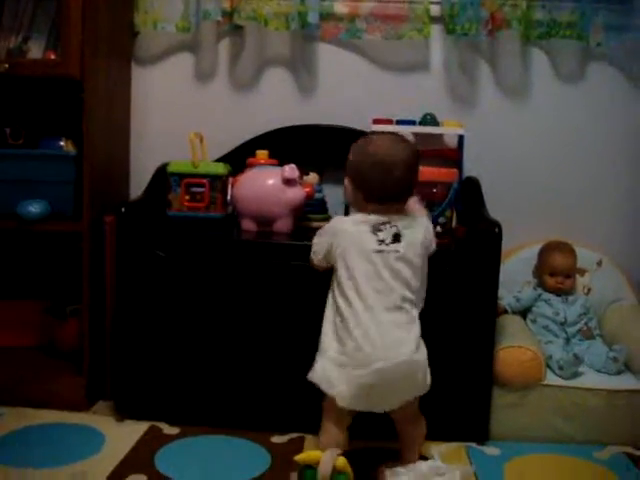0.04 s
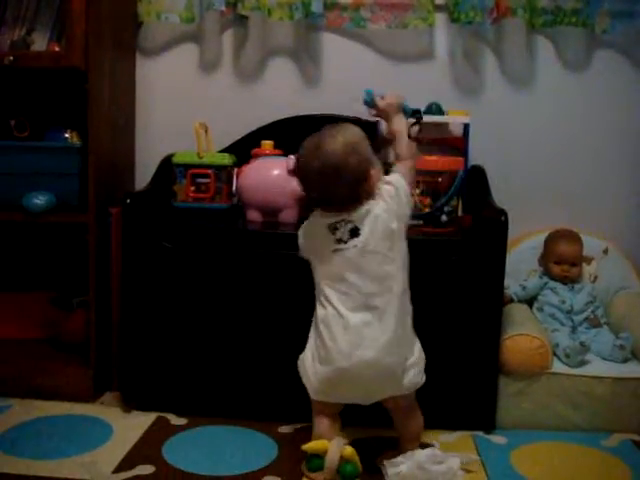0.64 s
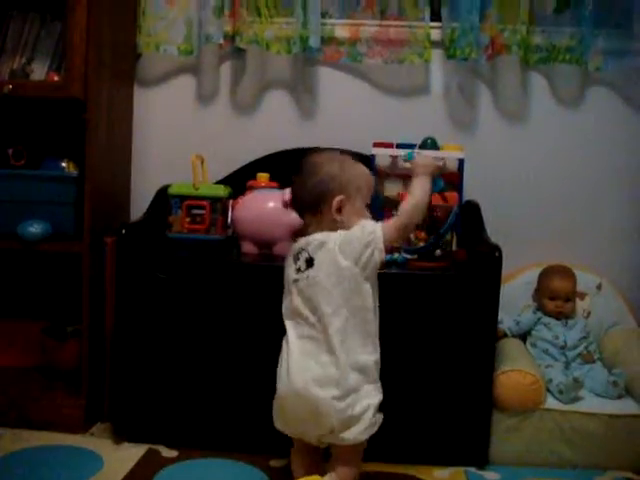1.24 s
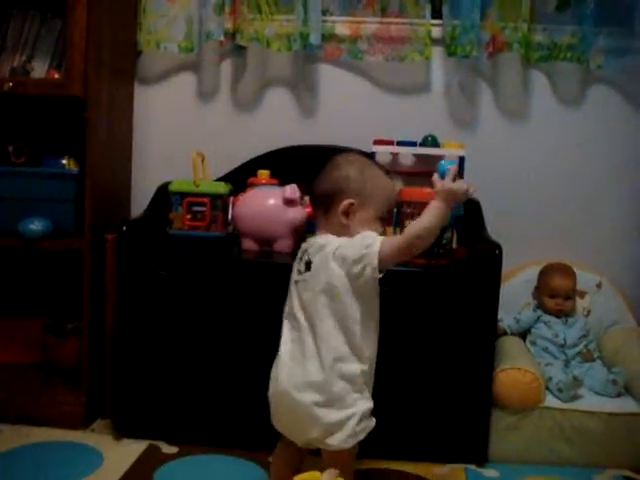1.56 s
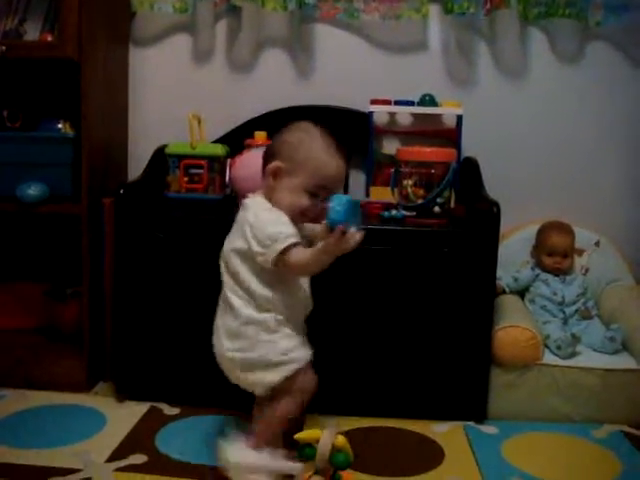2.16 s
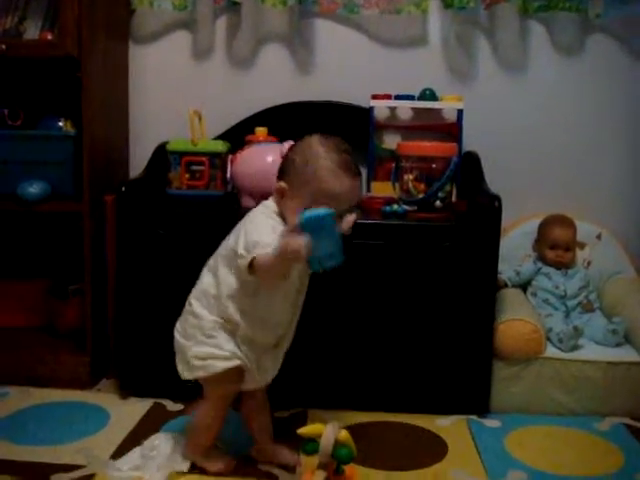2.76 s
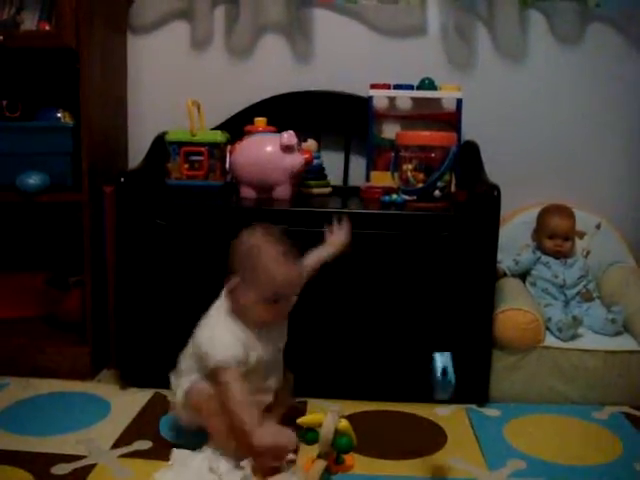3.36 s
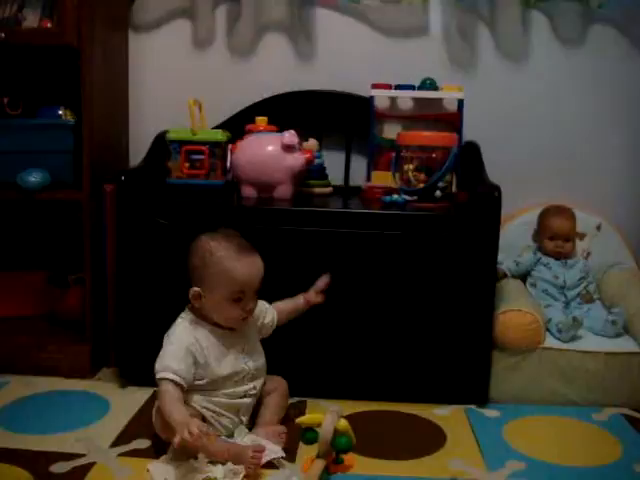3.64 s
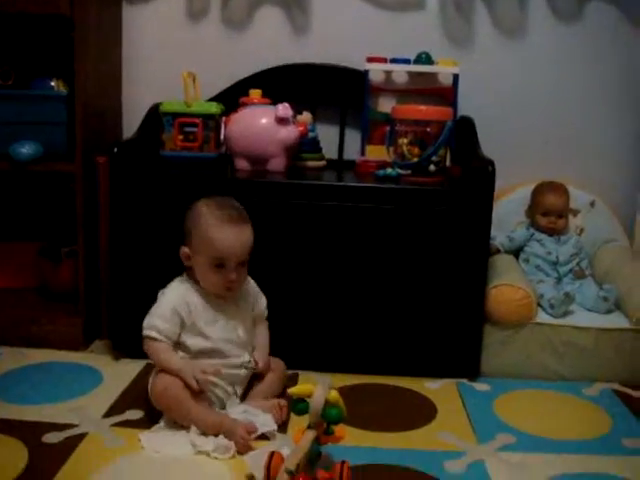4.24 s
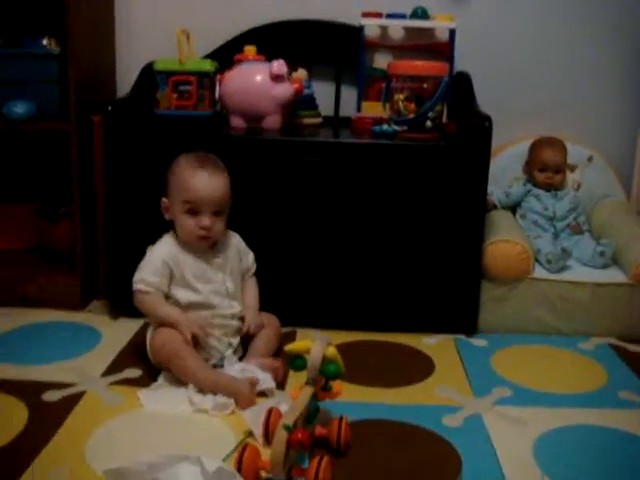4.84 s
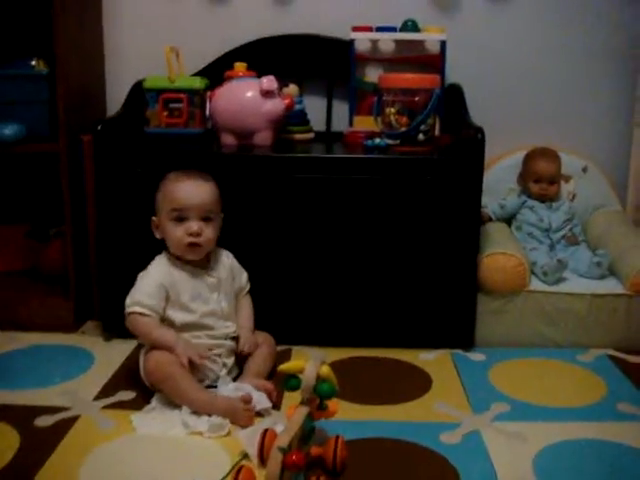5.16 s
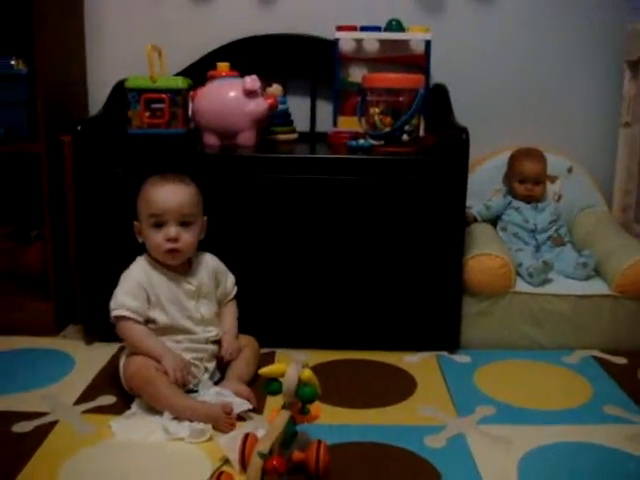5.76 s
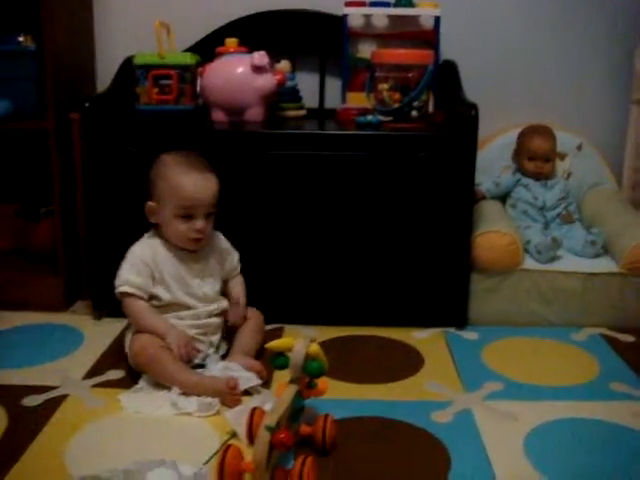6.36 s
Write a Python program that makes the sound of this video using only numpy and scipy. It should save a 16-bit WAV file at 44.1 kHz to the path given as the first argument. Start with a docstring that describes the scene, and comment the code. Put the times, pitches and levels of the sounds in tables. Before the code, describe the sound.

Soft room tone and microphone hiss run throughout in a small bedroom. For the first three seconds a toddler drags a hollow plastic toy over other toys, making quiet taps and rubs, with a soft sliding scrape around 1.3 seconds. At 2.7 seconds a camera lens motor whirrs faintly and briefly, lightly thumping the microphone. A few more taps and a rustle of clothes follow. At 3.3 seconds the toy falls with a sharp clack and quick bounces, the loudest moment. At 3.5 seconds the child sits on a play mat with a soft, low bump and rustle. From about 3.7 to 4.4 seconds the plastic toy clatters against a wooden toy in three quick clusters, each knock ringing briefly in the room. Then it goes quiet. The motor whirrs again near 5.6 seconds, and a very faint rustle runs from 5.9 seconds to the end.

```python
"""Over room tone and microphone hiss, a toddler drags a plastic toy across others on a chest: light taps,
scrapes, a ringing hollow shell. A camera's lens motor whirrs briefly. At 3.3 s the toy falls and bounces,
the child sits down with a bump on a play mat, and the toy clatters against a wooden pull toy, the small
bedroom ringing after each knock. The motor whirrs once more, and a faint rustle closes the scene."""
import sys
import numpy as np
from scipy import signal
from scipy.fft import rfft, irfft, next_fast_len
from scipy.io import wavfile
from scipy.ndimage import uniform_filter1d

SR = 44100
rng = np.random.default_rng(int(sys.argv[2]) if len(sys.argv) > 2 else 0)


def generate_wav(signal):
    """Clip the signal to [-1, 1] and save it as 16-bit WAV at the path in sys.argv[1]."""
    frames = np.transpose(np.atleast_2d(signal))
    scaled = np.clip(frames, -1, 1) * 32767
    pcm = np.round(scaled).astype(np.int16)
    wavfile.write(sys.argv[1], SR, pcm)


N = 282681
TIME = np.arange(N) / SR

# room tone and hiss, a little louder at first: t/s, level/dB
ROOM_TONE_FADE = [(0, -49.5), (.55, -52.5), (6.4, -53.5)]
# EQ curves of the room tone, rubbing and sliding: f/Hz, relative level/dB
ROOM_TONE_EQ = [(15, -42), (25, -17), (49, -14), (145, -7), (494, -4), (532, -5), (1020, -5.5), (1640, -10),
                (2280, -8.5), (3000, -15), (7780, -17), (10000, -21.5), (13000, -53), (22000, -120)]
RUB_EQ = [(530, -47), (900, -8.5), (1220, -11), (1550, -7.5), (2900, -3.5), (4990, -5), (6820, -4.5),
          (10000, -9), (13000, -52), (22000, -120)]
SLIDE_EQ = [(410, -46), (700, 0), (954, 8), (1180, 4), (2040, 8), (3500, -49), (4550, -24), (7700, -120)]
# runs of the lens motor: start/s, stop/s, whirr f/Hz, whirr level/dB
MOTOR_RUNS = [(2.68, 2.813, 258, -56), (5.55, 5.683, 257.3, -55)]
# resonances of its gears: low/Hz, high/Hz, level at full speed/dB
GEAR_BANDS = [(713, 1020, -54), (1990, 2520, -54.5)]
# clothes and mat as the child crouches, sits and shifts: t/s, length/s, level/dB
RUSTLE_CUES = [(2.93, 0.087, -42), (3.05, 0.18, -49), (3.54, 0.092, -40.5), (5.87, .53, -61)]
# the toy sliding down another one: t/s, length/s, level/dB
SLIDE_CUES = [(1.29, 0.26, -48.5)]
# plastic rubbing on plastic and cloth: t/s, length/s, level/dB, shell ring relative to the rub/dB
RUB_CUES = [(0.0, 0.032, -48, -1), (0.236, 0.038, -49, -1.5), (0.722, 0.18, -49.5, -12),
            (0.867, 0.29, -45.5, -10.5), (1.118, 0.054, -46.5, -17), (1.227, .36, -53.5, -26),
            (1.326, 0.19, -45, -14), (2.026, 0.073, -44.5, -9), (2.125, 0.087, -47, -11),
            (2.277, 0.59, -50.5, -9), (2.538, 0.057, -48.5, -10), (2.727, 0.07, -59.5, 9.5)]
# broad, damped resonances of the rubbed plastic and of each struck toy: f/Hz, width/Hz, boost/dB
RUB_BODY = [(3150, 3600, 1)]
PLASTIC_BODY = [(152, 29, 11), (715, 460, 6), (1973, 250, 9), (2360, 300, 8.5), (6280, 400, 5)]
WOOD_BODY = [(140, 92, -10), (290, 150, 9), (526, 220, 0.5), (850, 203, 14), (2205, 1100, 9.5),
             (5980, 3600, 13)]
# ringing modes of each toy: f/Hz, relative level/dB, t60/s
PLASTIC_MODES = [(170, 6, 0.073), (585, 2.5, 0.12), (786, 1, 0.056), (943, 4, 0.15), (1070, -7, 0.21),
                 (1820, 7, 0.12), (1858, 3, 0.13), (1887, 4, 0.17), (1934, 3.5, 0.26), (2200, -7, 0.2),
                 (2180, 2, 0.26), (2300, 3, 0.22), (2300, 4, 0.2), (2420, -15, 0.09), (3293, 3.5, 0.097),
                 (4730, -8, 0.059), (4540, -1.5, 0.22), (6000, -3, 0.12), (6650, -14, 0.16),
                 (6440, -5, 0.096), (8500, -11, 0.11)]
WOOD_MODES = [(266, -0.5, 0.052), (376, -2.5, 0.065), (751, 0, 0.11), (801.6, 0, 0.09), (892, -2, 0.12),
              (1757, -3, 0.15), (2140, -3, 0.23), (2363, -2.5, 0.13), (2675, -2, 0.1), (3300, 4, 0.024),
              (5300, -9, 0.1), (6460, 2, 0.034), (6340, 3.5, 0.08), (6450, -15, 0.043), (8450, -2, 0.017)]
# the four bands of a hit (thud, knock, clack, tick): low/Hz, high/Hz
HIT_BANDS = [(70, 500), (500, 1500), (1500, 3000), (3000, 12000)]
# each toy's balance in an ordinary hit: thud/dB, knock/dB, clack/dB, tick/dB
PLASTIC_BALANCE = [-16.5, -9, -0.5, -3.5]
WOOD_BALANCE = [-17, -6.5, -1, -1]
# a harder contact trades lows for highs: gain per hardness/(dB/dB) for each of the four bands
HARDNESS_TILT = [-1.12, -1., -0.082, 0.9]
# taps, fall and clatter on each toy: t/s, relative level/dB, hardness/dB, rattle decay/s
PLASTIC_HITS = [(0.022, -40.5, -8.5, .01), (0.243, -58, 3, .01), (0.885, -42, 4, .012),
                (1.350, -41, -5, .002), (2.632, -35.5, -6, 0.011), (2.912, -29.5, 0.5, 0.023),
                (3.083, -34.5, -2, 0.038), (3.274, -38, 2.5, 0.0073), (3.333, -6.5, 5.5, 0.01),
                (3.348, -17.5, 0.5, 0.0082), (3.369, -14.5, 4.5, 0.04), (3.715, -13, -2.5, .005)]
WOOD_HITS = [(3.524, -34, -12.5, 0.0094), (3.540, -25.5, -8.5, 0.0078), (3.715, -22, -10, 0.0053),
             (3.738, -25.5, 3, .005), (3.748, -26, 2, 0.0074), (3.782, -24.5, 7, 0.0054),
             (3.792, -23, 7.5, 0.0087), (3.962, -35, -2.5, 0.014), (3.982, -33, -2.5, 0.0034),
             (4.002, -24, 4, 0.005), (4.095, -31, 10, 0.0028), (4.106, -27.5, 3, 0.0029),
             (4.243, -13, 0, 0.0085), (4.253, -26, -7, 0.0063), (4.271, -19, -3, 0.0084),
             (4.319, -28, 6, 0.002), (4.327, -17, 2, 0.0082), (4.342, -23, -2.5, .007),
             (4.366, -23, 0.5, 0.0032)]
# the bedroom's reverb time: f/Hz, t60/s
BEDROOM_DECAY = [(150, 0.19), (500, 0.35), (1000, 0.44), (2500, 0.4), (5000, 0.32), (10000, 0.34)]


def from_db(db):
    """Decibels to gain."""
    return 10 ** (np.asarray(db) / 20)


def rms_one(x):
    """Scale to rms 1."""
    return x / np.sqrt(np.mean(x ** 2) + 1e-20)


def energy_one(x):
    """Scale to total energy 1."""
    return x / np.sqrt(np.sum(x ** 2) + 1e-20)


def at_hz(points, hz):
    """Read a curve on a log-frequency axis."""
    known_hz, values = np.transpose(points)
    return np.interp(np.log(hz), np.log(known_hz), values)


def band(x, low_hz, high_hz):
    """Causal band-pass."""
    sos = signal.butter(3, [low_hz, high_hz], "band", fs=SR, output="sos")
    return signal.sosfilt(sos, x + 1e-18)


def band_noise(low_hz, high_hz, count=N):
    """A band of noise at rms 1."""
    return rms_one(band(rng.standard_normal(count), low_hz, high_hz))


def coloured(x, eq):
    """Shape a noise with an EQ curve; rms 1."""
    size = next_fast_len(N)
    hz = np.maximum(np.fft.rfftfreq(size, 1 / SR), 1)
    return rms_one(irfft(rfft(x, size) * from_db(at_hz(eq, hz)), size)[:N])


def resonate(x, peaks):
    """Boost each broad body resonance in turn."""
    for hz, width_hz, db in peaks:
        b, a = signal.iirpeak(hz, hz / width_hz, fs=SR)
        x = x + (from_db(db) - 1) * signal.lfilter(b, a, x + 1e-18)
    return x


def add(out, start_s, sound):
    """Mix a sound in at its cue."""
    i = round(start_s * SR)
    out[i:i + len(sound)] += sound[:N - i]


def grains(count, per_s, spread_db):
    """Crackle: random tiny contacts of uneven size."""
    sizes = from_db(spread_db * np.minimum(rng.exponential(1, count), 4)) * rng.choice([-1, 1], count)
    return sizes * (rng.random(count) < per_s / SR)


def strokes(cues, attack_s, release_db_per_s=172):
    """Envelope: each stroke swells, holds and dies away; overlaps add in power."""
    power = np.zeros(N)
    for start_s, length_s, db in cues:
        swell = np.clip((TIME - start_s) / attack_s, 0, 1)
        stopped_s = np.maximum(TIME - start_s - length_s, 0)
        power += (swell * from_db(db - release_db_per_s * stopped_s)) ** 2
    return np.sqrt(power)


def friction(motion, eq, per_s, spread_db, hiss, uneven_db=1.15, uneven_hz=25):
    """A stream of tiny slips over a smooth hiss, under unsteady pressure."""
    slips = rms_one(grains(N, per_s, spread_db)) + hiss * rng.standard_normal(N)
    pressure = from_db(uneven_db * band_noise(uneven_hz / 4, uneven_hz))
    return motion * pressure * coloured(slips, eq)


def room_tone(hum_hz=58, hum_db=-71):
    """The bed: room noise, microphone hiss and a faint low hum."""
    fade = from_db(np.interp(TIME, *np.transpose(ROOM_TONE_FADE)))
    hum = from_db(hum_db) * np.sqrt(2) * np.sin(2 * np.pi * hum_hz * TIME)
    return fade * coloured(rng.standard_normal(N), ROOM_TONE_EQ) + hum


def lens_motor(thump_db=-35, settle_s=0.028, rumble_db=-55, run_on_s=0.094):
    """Switching on and off thumps the microphone; in between the motor whirrs and its gears rustle."""
    out = np.zeros(N)
    rumble = from_db(rumble_db) * band_noise(44, 224)
    gears = sum(from_db(db) * band_noise(low, high) for low, high, db in GEAR_BANDS)
    settle = np.exp(-1 / (settle_s * SR))
    coast = np.exp(-1 / (run_on_s * SR))
    for start_s, stop_s, whirr_hz, whirr_db in MOTOR_RUNS:
        on = 1. * ((TIME > start_s) & (TIME < stop_s))
        thump = signal.lfilter([1, -1], [1, -settle], uniform_filter1d(on, size=50))
        whirr = from_db(whirr_db) * np.sqrt(2) * np.sin(2 * np.pi * whirr_hz * TIME)
        speed = signal.lfilter([1 - coast], [1, -coast], on)
        out += from_db(thump_db) * thump + on * (whirr + rumble) + speed * gears
    return out


def rustle():
    """Clothes and mat brush together in a dense, fine crackle."""
    motion = strokes(RUSTLE_CUES, attack_s=0.016)
    return friction(motion, RUB_EQ, per_s=3200, spread_db=3.5, hiss=1.5)


def slide():
    """One toy slides down another with a soft midrange scrape."""
    motion = strokes(SLIDE_CUES, attack_s=0.032)
    return friction(motion, SLIDE_EQ, per_s=870, spread_db=-3.0, hiss=1.0)


def rubbing(attack_s=0.019, shell_hz=(2650, 3610)):
    """Each rub hisses with tiny slips and sets the hollow shell ringing."""
    start_s, length_s, db, ring_db = np.transpose(RUB_CUES)
    motion = strokes(zip(start_s, length_s, db), attack_s)
    ring_envelope = strokes(zip(start_s, length_s, db + ring_db), attack_s)
    slips = friction(motion, RUB_EQ, per_s=600, spread_db=2.0, hiss=1.76)
    shell = rms_one(band(grains(N, per_s=3000, spread_db=3.0), *shell_hz))
    return resonate(slips, RUB_BODY) + ring_envelope * shell


def bump(start_s=3.495, level_db=-37.5, t60_s=0.26, band_hz=(130, 480)):
    """A soft, low thud as the child lands on the mat."""
    out, t = np.zeros(N), np.arange(SR // 2) / SR
    add(out, start_s, band_noise(*band_hz, len(t)) * from_db(level_db - 60 * t / t60_s))
    return out


def bedroom(spots, build_s=0.0012, predelay_s=0.00032):
    """One reverb tail per spot: dense echoes build up, then die, lingering longest in the mids."""
    t = np.arange(SR // 2) / SR
    build_up = 1 - np.exp(-np.maximum(t - predelay_s, 0) / build_s)
    echoes = rng.standard_normal((spots, len(t))) * build_up
    edges_hz = np.geomspace(90, 11520, 8)
    tails = 0
    for low, high in zip(edges_hz, edges_hz[1:]):
        t60_s = at_hz(BEDROOM_DECAY, np.sqrt(low * high))
        tails += band(echoes, low, high) * energy_one(from_db(-60 * t / t60_s))
    return tails


def contact_force(t, rattle_s, chatter_db):
    """One hard contact, then loose parts buzz against each other, exciting all pitches evenly."""
    fade = np.exp(-t / rattle_s)
    chatter = energy_one(grains(len(t), per_s=9000, spread_db=2.9) * fade)
    spectrum = rfft((t == 0) + from_db(chatter_db) * chatter)
    whitened = irfft(spectrum / (np.abs(spectrum) + 1e-9), len(t))
    return energy_one(whitened * np.sqrt(fade))


def knocks(hits, body, modes, balance_db, ring_db, chatter_db, vary_db, gain_db, wet_db,
           looseness=0.27, firm_db=-25, fall_s=3.3, shadow_db=-5):
    """Hits on one toy: a rattling attack and ringing modes, each hit with its own room tail."""
    t = np.arange(SR // 2) / SR
    hz, mode_db, t60_s = np.transpose(modes)[:, :, None]
    rings = np.sin(2 * np.pi * hz * t) * from_db(mode_db - 60 * t / t60_s)
    out = np.zeros(N)
    for (start_s, level_db, hardness_db, rattle_s), tail in zip(hits, bedroom(len(hits))):
        band_db = level_db + np.array(balance_db) + hardness_db * np.array(HARDNESS_TILT)
        # a firm hit rattles and rings more than a light touch
        drive_db = looseness * (band_db[1] - firm_db)
        attack = energy_one(resonate(contact_force(t, rattle_s, chatter_db + drive_db), body))
        # every point of impact wakes the modes in its own proportions
        mode_mix = from_db(vary_db * rng.standard_normal(len(modes))) * rng.choice([-1, 1], len(modes))
        blow = attack + from_db(ring_db + drive_db) * energy_one(mode_mix @ rings)
        gains = from_db(band_db + gain_db)
        hit = sum(gain * energy_one(band(blow, *edges)) for gain, edges in zip(gains, HIT_BANDS))
        # until the toy falls, the child's body shadows its direct sound
        direct = from_db(shadow_db * (start_s < fall_s)) * hit
        reverb = from_db(wet_db) * signal.fftconvolve(hit, tail)[:len(t)]
        add(out, start_s, direct + reverb)
    return out


def scene():
    """Mono mix: plastic and wooden knocks up front, handling sounds, motor and room tone behind."""
    plastic = knocks(PLASTIC_HITS, PLASTIC_BODY, PLASTIC_MODES, PLASTIC_BALANCE,
                     ring_db=-10, chatter_db=18, vary_db=-1.2, gain_db=27, wet_db=-4.5)
    wood = knocks(WOOD_HITS, WOOD_BODY, WOOD_MODES, WOOD_BALANCE,
                  ring_db=-7.5, chatter_db=10.5, vary_db=3.5, gain_db=24.5, wet_db=-2.5)
    return (plastic + wood + rustle() + slide() + rubbing() + bump() + lens_motor() + room_tone())[None]


def record(dry, ceiling=0.46, cutoff_hz=10050):
    """Soft clipping rounds the loudest peaks; a steep low-pass takes off the air."""
    rounded = ceiling * np.tanh(dry / ceiling)
    return signal.sosfilt(signal.ellip(10, .3, 60, cutoff_hz, fs=SR, output="sos"), rounded)


dry = scene()
out = record(dry)
generate_wav(out)
```